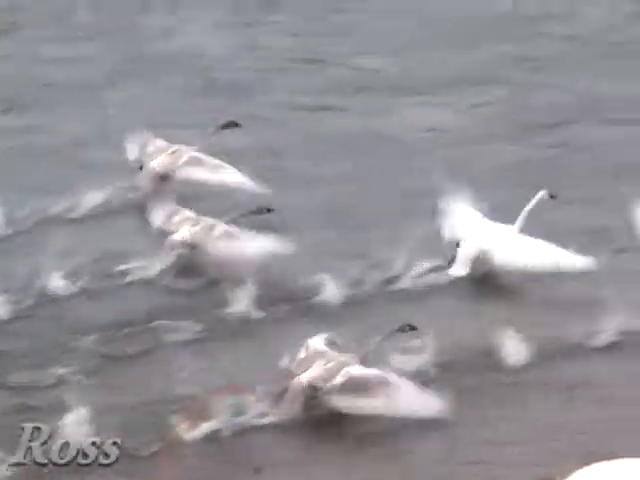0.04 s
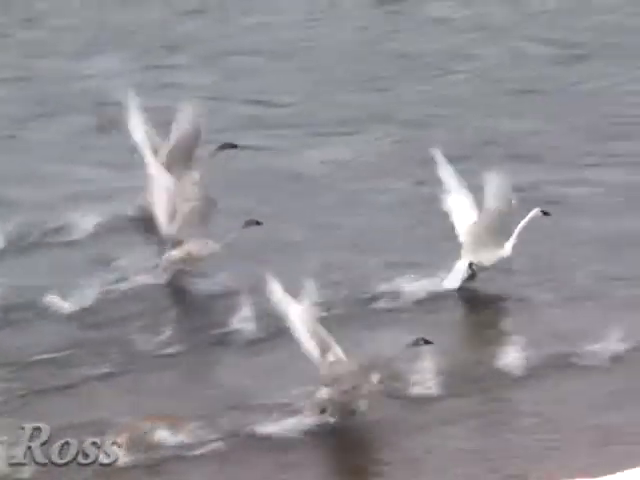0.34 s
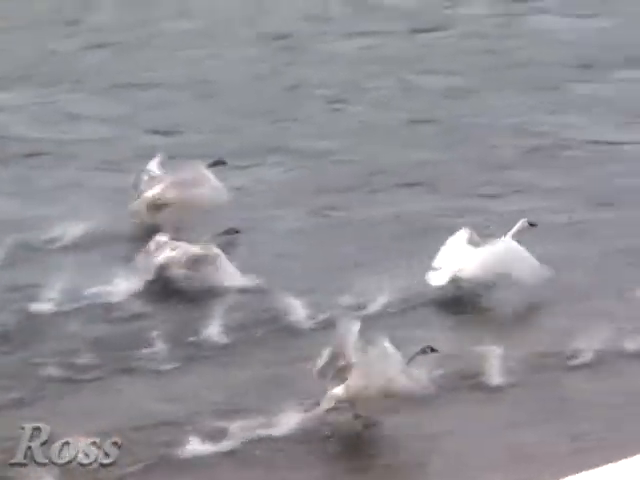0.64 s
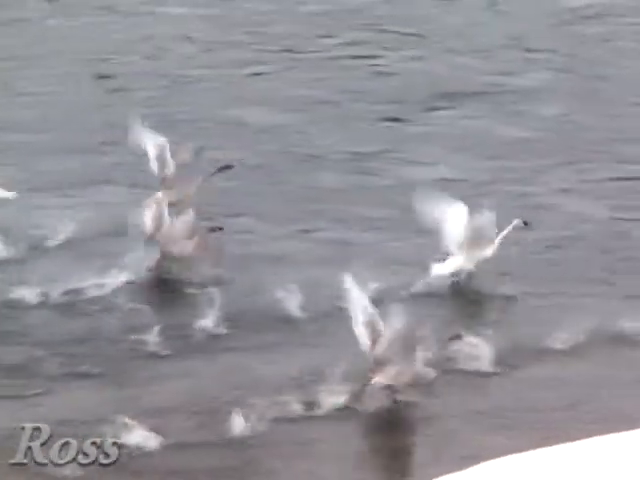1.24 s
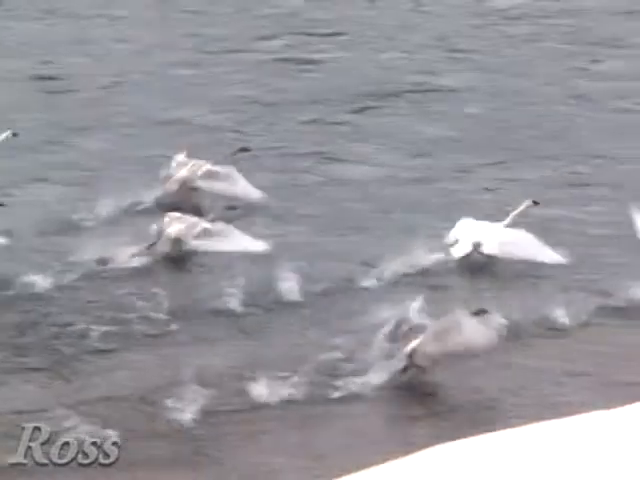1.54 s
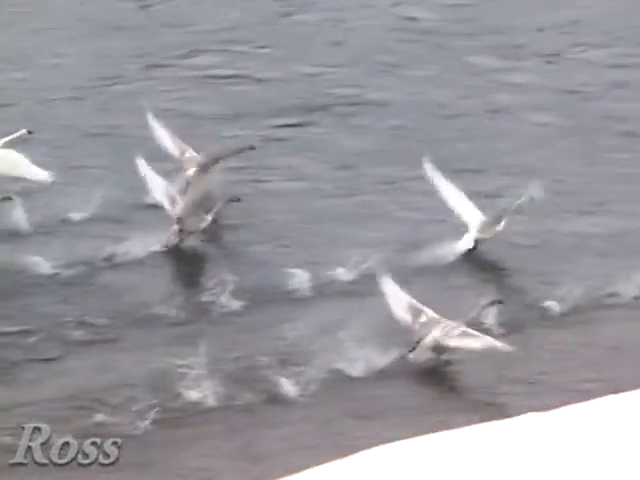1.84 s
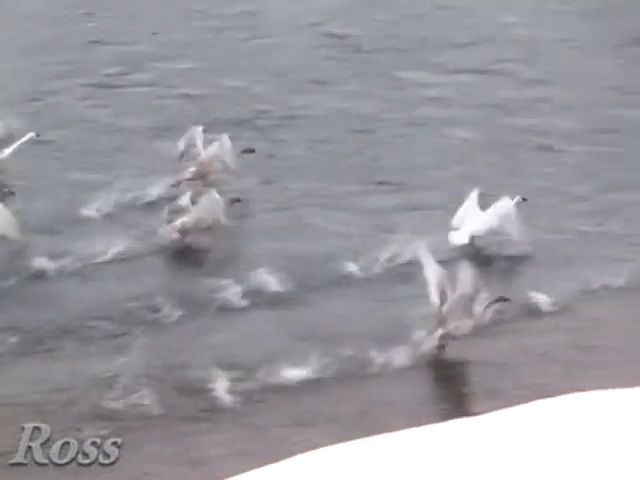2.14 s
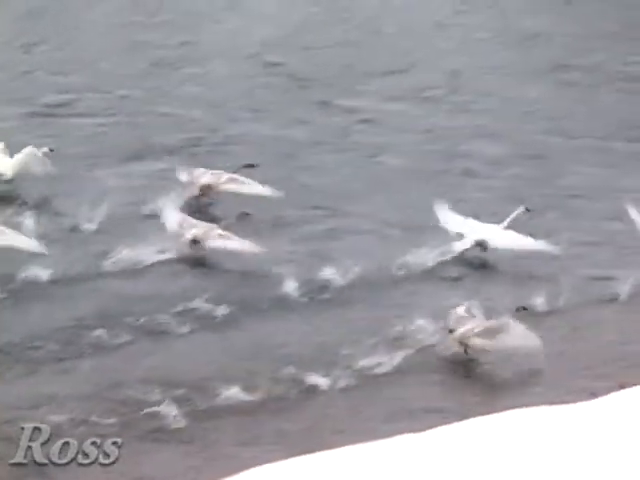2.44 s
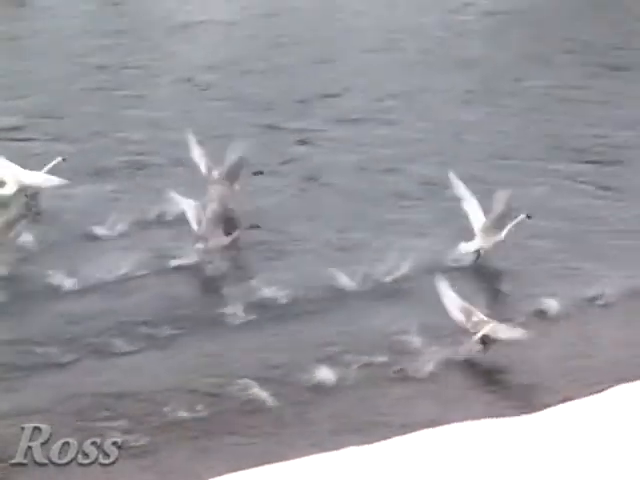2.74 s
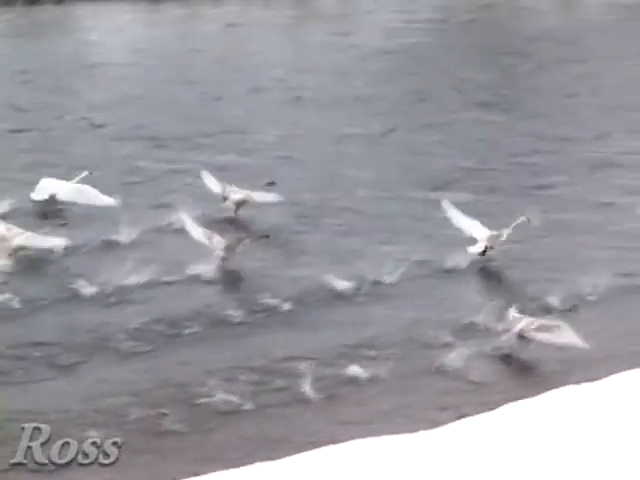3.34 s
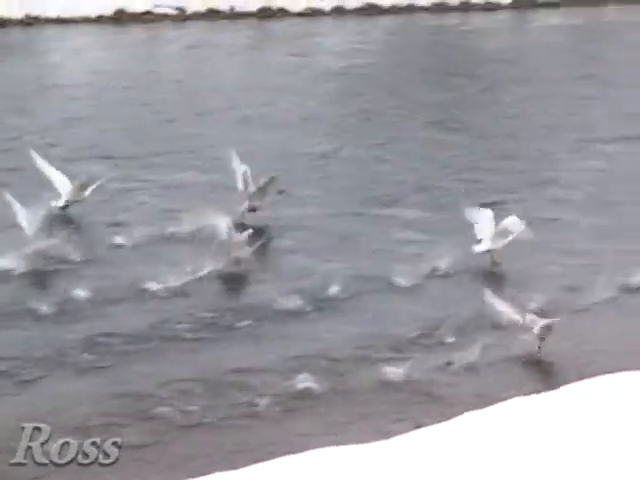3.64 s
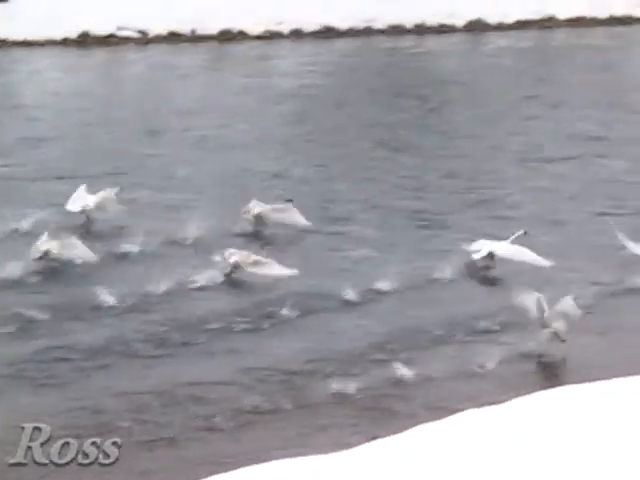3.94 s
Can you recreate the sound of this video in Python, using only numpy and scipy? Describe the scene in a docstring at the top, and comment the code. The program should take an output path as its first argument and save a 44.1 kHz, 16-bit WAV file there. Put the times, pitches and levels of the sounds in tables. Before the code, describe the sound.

Wet slaps of swans running across a river to take off, over rushing water.

```python
"""Wet slaps over rushing water: swans run across a river to take off, heard on a small camera.
Each webbed foot smacks the surface, punches in a pocket of air that rings low, and throws spray
that patters back. Churned water rushes and plops underneath. The dull microphone feeds only the
left channel and picks up the camera motor's faint whine; both channels carry faint hiss."""
import sys
import numpy as np
from scipy import signal
from scipy.fft import rfft, irfft
from scipy.io import wavfile
from scipy.ndimage import uniform_filter1d

SR = 44100
rng = np.random.default_rng(int(sys.argv[2]) if len(sys.argv) > 2 else 0)


def unload_audio(sound):
    """Save the sound as a 16-bit wav file, at the path given as the first command line argument."""
    columns = np.transpose(np.atleast_2d(sound))
    # keep every value between -1 and 1, then stretch to whole-number steps
    steps = np.round(np.clip(columns, -1, 1) * 32767)
    wavfile.write(sys.argv[1], SR, steps.astype(np.int16))


N = 176400


def db_to_gain(db):
    """Turn decibels into a number to multiply by."""
    return 10 ** (np.asarray(db) / 20)


def set_level(sound, db):
    """Set a sound's average (rms) level."""
    return sound * db_to_gain(db) / np.sqrt(np.mean(sound ** 2))


def add_burst(out, start_s, sound, db):
    """Mix in a short sound, its level counted as if its energy were spread over 20 ms."""
    sound = sound * db_to_gain(db) / np.sqrt(np.sum(sound ** 2) / (.02 * SR))
    start = int(np.clip(start_s * SR, 0, N - 1))
    out[start:start + len(sound)] += sound[:N - start]


def gain_over_time(points):
    """Join (time_s, level_db) points into a gain for every sample."""
    return db_to_gain(np.interp(np.arange(N) / SR, *np.array(points).T))


def gain_at_pitch(points, hz):
    """Read gains off a tone curve of (pitch_hz, level_db) points."""
    pitch_hz, level_db = np.array(points, float).T
    return db_to_gain(np.interp(np.log(hz + 1), np.log(pitch_hz), level_db))


def shape_tone(sound, points, size=4096):
    """Filter a sound so that it follows a tone curve."""
    cepstrum = irfft(np.log(gain_at_pitch(points, np.fft.rfftfreq(size, 1 / SR))))
    # make the filter ring only after a sound, never before it
    cepstrum[1:size // 2] *= 2
    cepstrum[size // 2 + 1:] = 0
    return signal.fftconvolve(sound, irfft(np.exp(rfft(cepstrum))))[:len(sound)]


def shaped_noise(points):
    """Noise that follows a tone curve."""
    return shape_tone(rng.standard_normal(N), points)


def wander(turns_per_s):
    """A smooth random drift, about 1 in size."""
    hold = int(SR / turns_per_s)
    steps = np.repeat(rng.standard_normal(N // hold + 1), hold)
    return set_level(uniform_filter1d(uniform_filter1d(steps, hold), hold)[:N], 0)


def air_pocket(hz, ring_s, rise=0, attack_s=0):
    """Trapped air rings, fading 60 dB in ring_s while its pitch climbs by the fraction rise."""
    t = np.arange(int(ring_s * SR) + 2) / SR
    onset = 1 - np.exp(-t / attack_s) if attack_s else 1
    fade = np.exp(-np.log(1000) * t / ring_s)
    return onset * fade * np.sin(2 * np.pi * hz * t * (1 + rise * t / ring_s / 2))


def camera_hiss():
    """The camera's electronics add a faint, steady hiss."""
    # tone of the hiss: pitch_hz, level_db
    hiss_tone = [(20, 21.5), (60, 14), (150, 1.5), (1000, 0.5), (4000, 0), (7500, -4), (8600, -10),
                 (10000, -25.5), (16000, -28)]
    return set_level(shaped_noise(hiss_tone), -71.5)


def motor_whine():
    """The camera motor gives off thin, high tones that waver in level and pitch."""
    # motor tones: pitch_hz, relative_level_db
    motor_tones = [(3106, -86), (3655, -80), (3838, -82), (4021, -99), (4204, -83), (4753, -94),
                   (4936, -99), (5340, -101), (5739, -100), (7020, -103), (7171, -103), (7386, -104),
                   (7515, -102), (7666, -102), (8177, -106), (8323, -106)]
    t, out = np.arange(N) / SR, 0
    boost_db, waver_db, jitter_hz = 4.5, 0.66, 2.83
    for hz, db in motor_tones:
        peak = np.sqrt(2) * db_to_gain(db + boost_db - waver_db * wander(17))
        cycles = hz * t + np.cumsum(jitter_hz * wander(30)) / SR
        out = out + peak * np.sin(2 * np.pi * cycles)
    return out


def river():
    """Rushing water with a little wind below it: pitch bands swell together and flicker alone."""
    # tone of the rush: pitch_hz, level_db
    river_tone = [(20, -17), (40, -8), (70, -2.5), (120, -3), (200, -0.5), (280, 1), (400, -4), (800, -9),
                  (1400, -12), (2000, -16.5), (4000, -16), (9000, -28)]
    swell_db, flicker_db = .5, 2.5
    hz = np.fft.rfftfreq(N, 1 / SR)
    spectrum = rfft(rng.standard_normal(N)) * gain_at_pitch(river_tone, hz)
    swell, out = wander(2.8), 0
    bands = np.floor(2 * np.log2(np.maximum(hz, 40) / 40))  # half an octave each
    for band in np.unique(bands):
        band_noise = irfft(spectrum * (bands == band), N)
        out = out + band_noise * db_to_gain(swell_db * swell + flicker_db * wander(24.7))
    return set_level(out, -41.5)


def patter(per_s, low_hz, high_hz, cycles, scatter_db):
    """Falling water and the feet of farther birds make little bubbles that ring at random."""
    out = np.zeros(N)
    for when, pitch, size, length, sign in rng.random((int(per_s * N / SR), 5)):
        hz = low_hz * (high_hz / low_hz) ** pitch
        gain = db_to_gain(-scatter_db * np.log(1 - .97 * size))  # many quiet, a few loud
        bubble = gain * np.sign(sign - .5) * air_pocket(hz, cycles * (.5 + length) / hz, rise=0.3)
        start = int(when * N)
        out[start:start + len(bubble)] += bubble[:N - start]
    return set_level(out, 0)


def fine_spray():
    """Fine spray fizzes around 2 kHz, loudest between one and two seconds in."""
    # tone of the fizz: pitch_hz, level_db
    fizz_tone = [(700, -28), (1400, -2.5), (2000, 1), (2600, -2.5), (5000, -18)]
    # loudness of the fizz: time_s, level_db
    fizz_levels = [(0, -62), (.8, -68.5), (1.1, -50.5), (1.4, -58), (1.8, -53), (2.4, -67), (4, -67)]
    return set_level(shaped_noise(fizz_tone), 0) * gain_over_time(fizz_levels)


def foot_slaps():
    """Each foot cracks and tears the water open, with a hollow smack, a low thump and a tail of spray."""
    # one row per slap, levels before the offsets below: start_s, pocket_hz, pocket_db, pocket_ring_s,
    # smack_hz, smack_db, smack_cycles (to fade 60 dB; negative means no smack), tear_db
    slaps = [(0.2384, 256, -22, 0.0405, 482.6, -32, 16, -32.5),
             (0.3031, 305.4, -31, 0.0236, 817, -28, 6, -38.5),
             (0.5418, 283, -40.5, 0.02, 766, -36.5, 5.5, -52.5),
             (0.5493, 289, -40.5, 0.086, 844, -34, 3.5, -43),
             (0.5751, 260, -43.5, 0.077, 1363, -47.5, 16, -54),
             (0.697, 275, -39, 0.049, 1116, -46, -2, -49),
             (0.7505, 219, -34.5, 0.0145, 704.3, -30.5, 11.5, -36),
             (0.7758, 254.3, -36, 0.0318, 679, -38, 2.5, -50.5),
             (0.8252, 207.6, -43, 0.13, 806, -40, 30, -40),
             (1.0303, 191, -43.5, 0.0224, 767, -42, 5.5, -47),
             (1.056, 254.4, -28, 0.0166, 479, -38.5, 15, -30),
             (1.0974, 307.6, -42, 0.016, 765, -42, 5, -47.5),
             (1.1146, 257.4, -31, 0.0277, 870, -53, 9, -49), (1.165, 207.3, -38, 0.047, 505, -42, 11, -48),
             (1.1939, 292.7, -41.5, 0.0264, 616, -33.5, 1, -46.5),
             (1.3494, 266, -40, 0.055, 707, -36.5, -7.5, -40),
             (1.4922, 212.6, -41.5, 0.059, 860, -69.5, 16, -42.5),
             (1.565, 297, -37, 0.05, 1420, -51.5, 16, -42),
             (1.5919, 227.3, -30.5, 0.0273, 1248, -40.5, 4, -43.5),
             (1.6609, 273, -42.5, 0.0081, 900, -41, 3.5, -39),
             (1.7819, 264.5, -39.5, 0.034, 1124, -47, -6.5, -37.5),
             (1.7964, 269, -40, 0.086, 1140, -45, 19, -44),
             (1.8688, 230, -36, 0.031, 1300, -41, 6.5, -40.5),
             (1.9, 258.3, -26.5, 0.0375, 603, -31.5, 3, -37.5),
             (1.9585, 274.9, -36, 0.071, 1015, -40, 5, -40.5),
             (2.0704, 212, -37, 0.0256, 877, -33.5, 12, -40.5),
             (2.115, 287, -37.5, 0.036, 670, -31.5, -4.5, -41.5),
             (2.1556, 218, -36.5, 0.0295, 420, -52, -0.5, -49.5),
             (2.3648, 189.5, -38, 0.05, 1500, -51, 6.5, -46.5),
             (2.4106, 206.8, -39.5, 0.136, 1325, -57, 2, -58.5),
             (2.4582, 261, -62, 0.017, 1073, -36.5, 5, -43.5),
             (2.5754, 219.5, -35.5, 0.0427, 776, -37.5, 8, -38.5),
             (2.6619, 275, -35, 0.048, 1169, -45, 12.5, -40),
             (2.6945, 323, -31.5, 0.0183, 449, -47, 1, -44.5),
             (2.7342, 220, -41, 0.0167, 925, -47.5, 5.5, -50),
             (2.8986, 200, -41, 0.0125, 613, -48.5, 18, -69.5),
             (2.9632, 276.2, -34.5, 0.034, 704, -35.5, 3, -40),
             (3.1455, 204, -40, 0.0363, 919, -36.5, 21.5, -39),
             (3.163, 225.6, -40.5, 0.061, 1434, -44, 8, -43.5),
             (3.2836, 227, -45.5, 0.034, 420, -50, 0.5, -46.5),
             (3.3329, 232.5, -36, 0.0155, 661, -40, 5, -41),
             (3.456, 289.6, -33.5, 0.0615, 927, -43, 8.5, -46),
             (3.5216, 280, -38.5, 0.0061, 738, -41.5, 10, -45),
             (3.5777, 291, -38.5, 0.0246, 528, -59.5, 6.5, -44),
             (3.7026, 276.8, -32.5, 0.0594, 490, -38.5, 12, -45.5),
             (3.771, 232, -44.5, 0.048, 883, -39, 1.5, -50),
             (3.834, 176.7, -37, 0.0232, 420, -68.5, 4.5, -76),
             (3.9377, 231.6, -36.5, 0.0206, 771.6, -45, 29, -40.5)]
    # large trapped bubble that rings on: start_s, pitch_hz, level_db, ring_s
    big_bubbles = [(.566, 261.7, -31, 0.537)]
    # tone of tearing water and spray: pitch_hz, level_db
    splash_tone = [(100, -18.5), (300, 8), (500, 9), (900, 1.5), (1400, 2), (2000, -3.5), (2700, -11),
                   (4000, -15), (9000, -18.5)]
    # tone of a thin sheet of water snapping: pitch_hz, level_db
    crack_tone = [(500, -23), (1400, -3), (2100, -0.5), (3000, 0.5), (4300, -4), (5500, -12.5), (9000, -20)]
    out, t = np.zeros(N), np.arange(SR // 5) / SR
    tear, crack = shaped_noise(splash_tone), shaped_noise(crack_tone)
    ticks = rng.standard_normal(N) * (rng.random(N) < 1500 / SR)  # about 1500 a second
    spray = shape_tone(ticks, splash_tone)
    lead_s, tear_decay_s, crack_decay_s, spray_decay_s = .007, .00772, .0045, .035
    build_up = (t / lead_s) ** 3  # the water starts to open just before the smack
    tear_shape = np.minimum(build_up, np.exp((lead_s - t) / tear_decay_s))
    crack_shape = np.minimum(build_up, np.exp((lead_s - t) / crack_decay_s))
    for start_s, pocket_hz, pocket_db, pocket_ring_s, smack_hz, smack_db, smack_cycles, tear_db in slaps:
        piece = rng.integers(N - len(t)) + np.arange(len(t))  # a random stretch of the noises
        smack = air_pocket(smack_hz, smack_cycles / smack_hz, attack_s=0.0003)
        thump = air_pocket(pocket_hz, pocket_ring_s, rise=0.073, attack_s=0.000233)
        add_burst(out, start_s - lead_s, tear[piece] * tear_shape, tear_db - 1)
        add_burst(out, start_s - lead_s, crack[piece] * crack_shape, tear_db - 8.5)
        add_burst(out, start_s, smack, smack_db - 3)
        add_burst(out, start_s, thump, pocket_db + 1)
        add_burst(out, start_s, spray[piece] * np.exp(-t / spray_decay_s), smack_db - 8)
    for start_s, hz, db, ring_s in big_bubbles:
        add_burst(out, start_s, air_pocket(hz, ring_s, attack_s=0.0051), db)
    bass_cut = signal.butter(2, 143.4, "high", fs=SR, output="sos")  # a foot is too small for deep bass
    return signal.sosfilt(bass_cut, out)


def scene():
    """Slaps over churned water and fine spray, on the left channel alone."""
    # the churned water eases as the flock draws away: time_s, gain_db
    churn_levels = [(0, 0.5), (0.801, 1), (1.6, -0.5), (2.3, -0.5), (2.8, -1), (3.4, -2), (4, -2)]
    slaps, rush = foot_slaps(), river()
    plops = db_to_gain(-53) * patter(per_s=110, low_hz=152.7, high_hz=426.4, cycles=8.3, scatter_db=5.5)
    drops = db_to_gain(-49.5) * patter(per_s=900, low_hz=455.7, high_hz=2340, cycles=7, scatter_db=5)
    churn = gain_over_time(churn_levels) * (rush + plops + drops)
    return np.array([slaps + fine_spray() + churn, np.zeros(N)])


def record(dry):
    """A dull microphone with a bass cut also picks up the motor; hiss lies on both channels."""
    # tone of the microphone: pitch_hz, gain_db
    mic_tone = [(20, -1), (1000, 2), (1200, -1), (1500, 1.5), (1780, -7), (1990, -1), (2330, -13.5),
                (2570, -8.5), (2850, -21.5), (3120, -15.5), (3350, -21), (3700, -15.5), (4200, -17.5),
                (4800, -24.5), (7000, -33.5), (10000, -41.5), (16000, -54)]
    bass_cut = signal.butter(3, 48.7, "high", fs=SR, output="sos")
    treble_cut = signal.ellip(8, .2, 70, 15800, fs=SR, output="sos")
    left = signal.sosfilt(bass_cut, shape_tone(dry[0], mic_tone)) + motor_whine()
    hiss = np.array([camera_hiss() for _ in dry])
    return signal.sosfilt(treble_cut, hiss + np.array([left, dry[1]]))


dry = scene()
out = record(dry)
unload_audio(out)
```